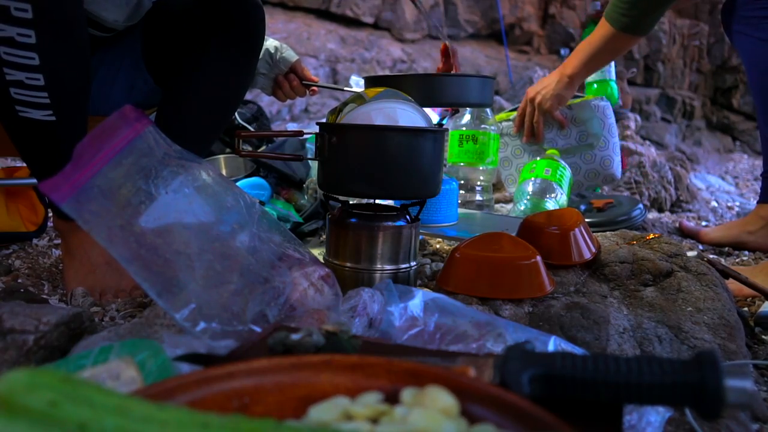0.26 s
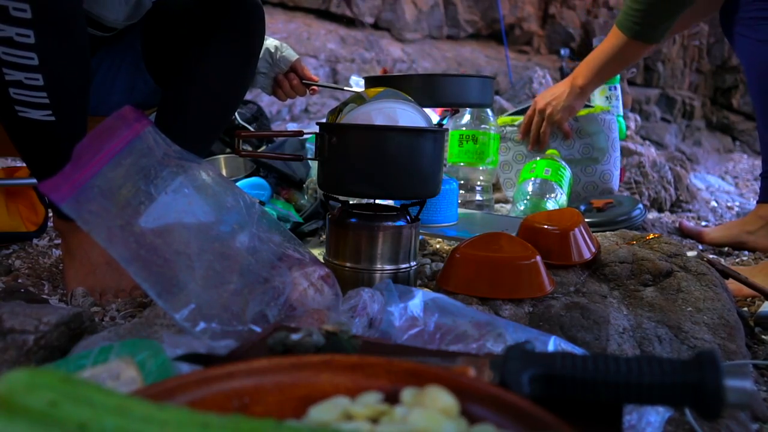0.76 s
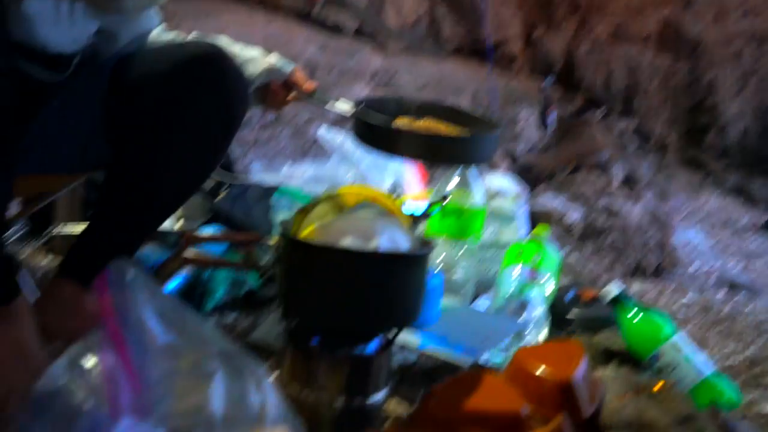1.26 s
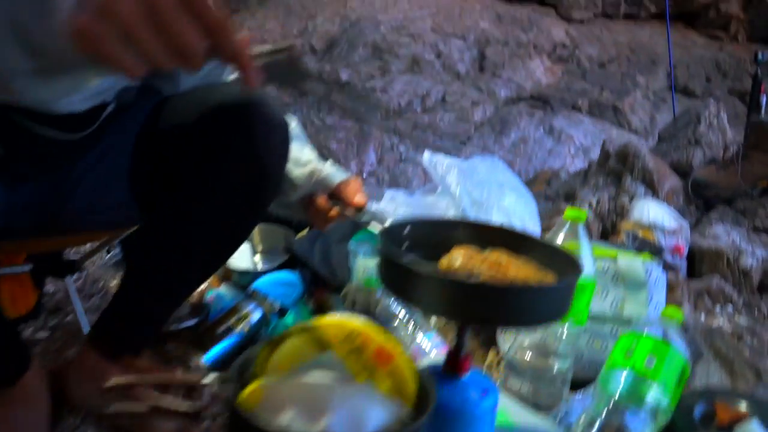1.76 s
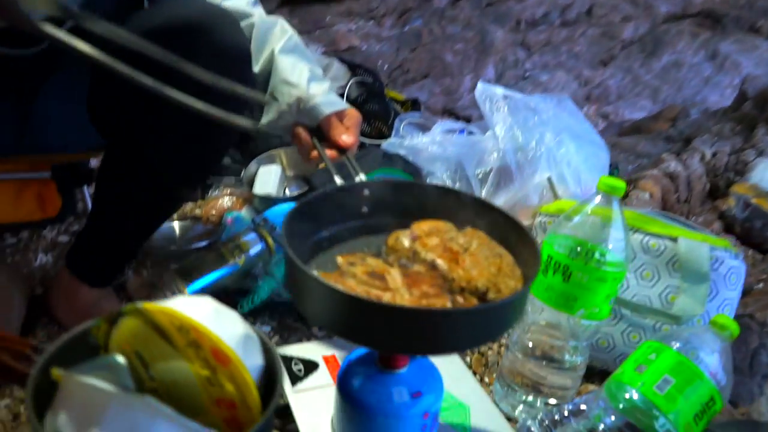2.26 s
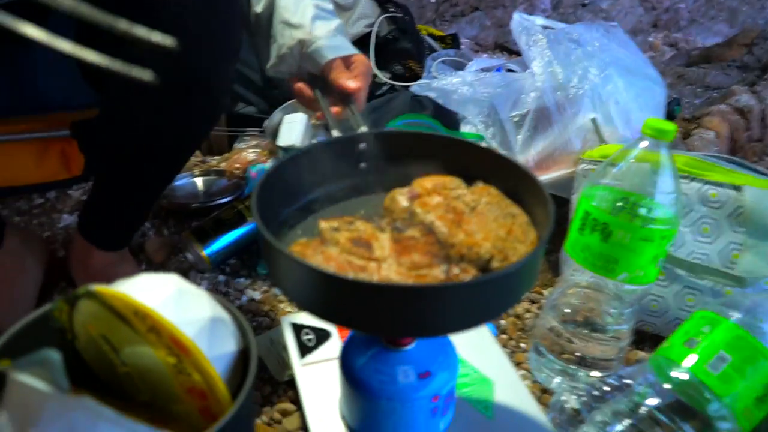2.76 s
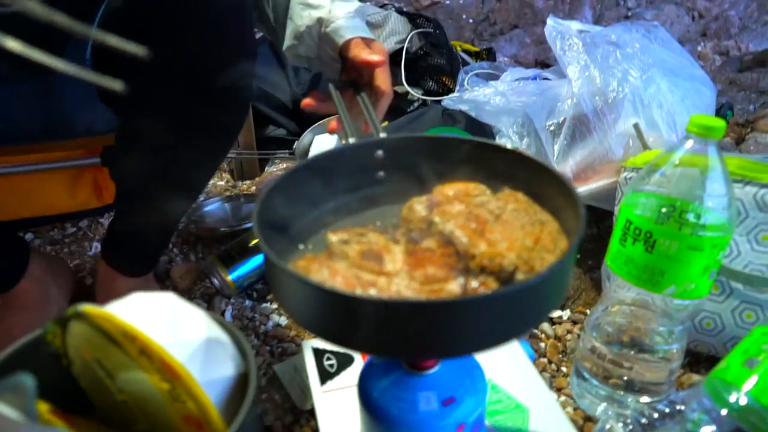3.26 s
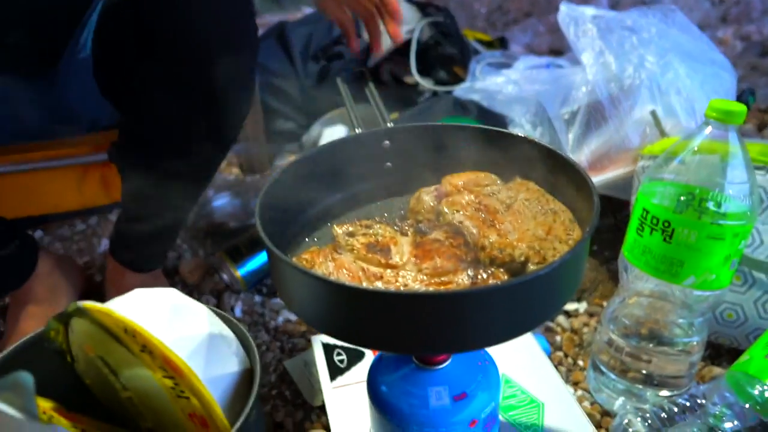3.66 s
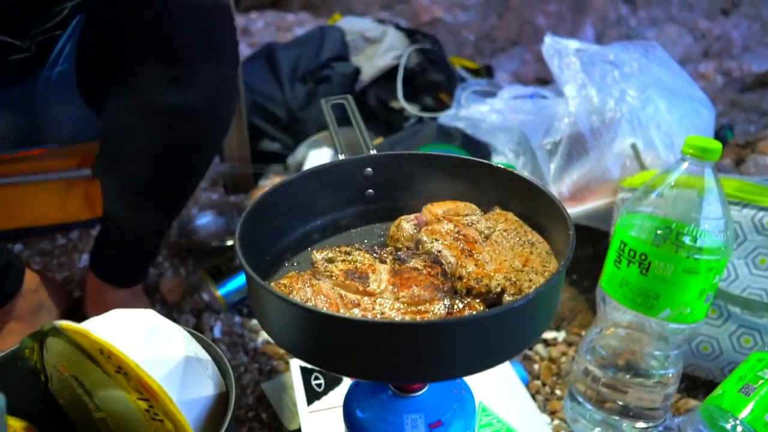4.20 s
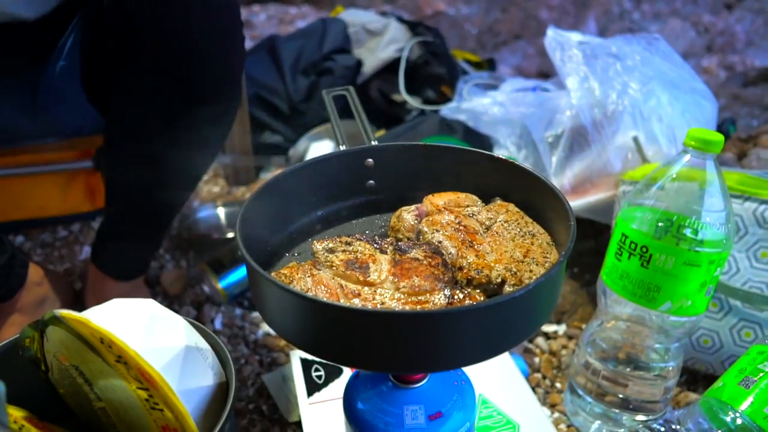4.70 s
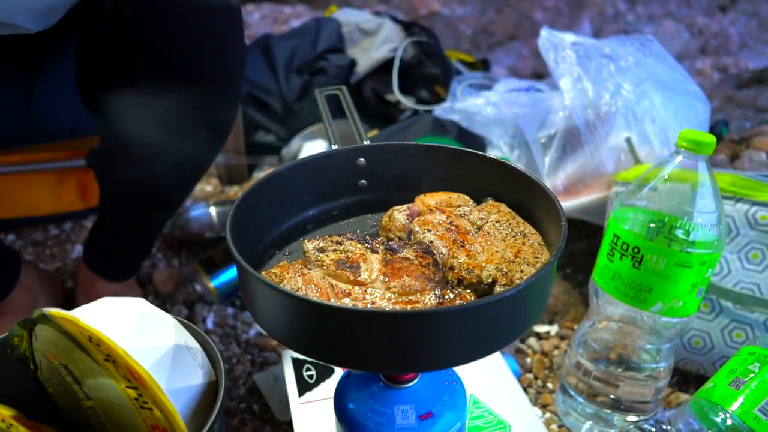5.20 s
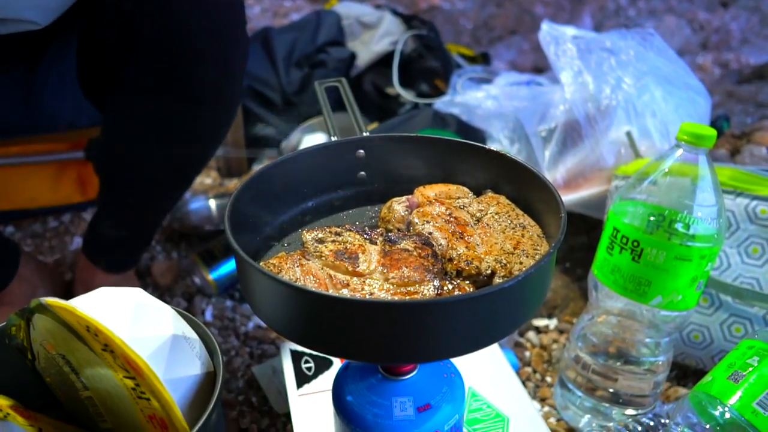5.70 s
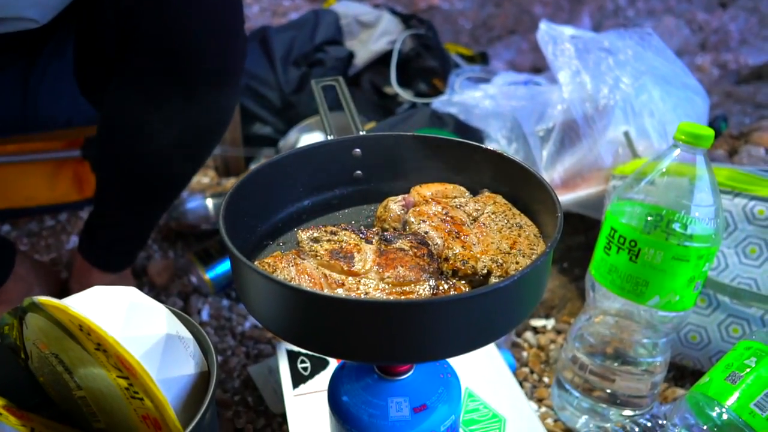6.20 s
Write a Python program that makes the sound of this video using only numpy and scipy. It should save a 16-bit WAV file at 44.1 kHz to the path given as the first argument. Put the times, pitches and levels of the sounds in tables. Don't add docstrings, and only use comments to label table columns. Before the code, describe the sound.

A hand-held microphone rests beside a roaring camp stove, with frying in the background and a tiny metal rattle. The scene switches suddenly with a low thud; the near roar drops away, wavering hums pass, and the frying pan arrives close, bright and crackling, popping with big fat spits over hissing gas. The sizzle and flame slowly weaken toward the end.

```python
import sys
import numpy as np
from scipy import signal
from scipy.fft import rfft, irfft, next_fast_len
from scipy.io import wavfile
from scipy.ndimage import uniform_filter1d

SR = 44100
rng = np.random.default_rng(int(sys.argv[2]) if len(sys.argv) > 2 else 0)


def amplitude_ratio(level_db):
    exponent = np.asarray(level_db, float) / 20
    return 10 ** exponent


def wav_out(sig):
    wavfile.write(sys.argv[1], SR, np.round(np.clip(np.atleast_2d(sig).T, -1, 1) * 32767).astype(np.int16))


N = 284445
CUT_S = 1.278
ARRIVE_S, CARRY_S = 2.13, 0.46

# time in seconds, level in dB.
TREMOR_LEVEL = [(0.0, -36), (0.22, -31), (0.34, -40), (0.77, -31), (1.02, -46), (1.26, -40), (1.29, -25),
                (1.55, -28), (1.95, -34), (2.04, -25), (2.12, -35), (2.58, -31), (2.9, -32), (3.4, -34),
                (3.55, -44), (3.85, -42), (4.1, -47), (6.45, -55)]
# pitch in Hz, level in dB per Hz.
TREMOR_COLOUR = [(2.4, -35), (4.0, 14), (22, 1), (30, 1), (48, -7), (62, -46), (110, -120)]
# pitch in Hz, level in dB, time to fade by 60 dB in seconds.
JOLT_MODES = [(9, -14, 0.8), (16.8, -18, 0.65), (35.8, -25, 0.87)]
# time in seconds, level in dB.
FINGER_THUMP = [(2.7, -24)]
# pitch in Hz, level in dB, time to fade by 60 dB in seconds.
HOUSING_MODES = [(82.4, -1.5, 0.15)]

# from in seconds, to in seconds, pitch in Hz, width in Hz, level in dB.
SWELLING_BANDS = [
    (0.065, .72, 5170, 520, -38),
    (0.75, 1.3, 3500, 300, -37),
    (1.76, 2.31, 582, 56, -27.5),
    (0.54, 1.4, 11000, 2300, -42),
    (1.24, 1.5, 2440, 280, -34),
    (1.46, 1.73, 2100, 340, -31.5),
    (1.9, 1.8, 3770, 350, -37),
    (1.91, 2.41, 1970, 380, -28.5),
    (0.75, 1.77, 975, 89, -30.5),
    (1.78, 2.1, 1020, 90, -32),
]

# time in seconds, level in dB.
NEAR_LEVEL = [(0.0, -17), (0.06, -19.5), (0.6, -18), (0.8, -19), (1.27, -17.5)]
# pitch in Hz, level in dB per Hz.
NEAR_ROAR = [(26, -41), (45, -8.5), (102, -12), (189, 0), (504, -7), (775, -5.5), (1370, -8), (1720, -24),
             (1990, -20), (2930, -21), (3820, -30), (5200, -20.5), (6000, -23), (7800, -31), (13200, -120)]
# pitch in Hz, width in Hz, level in dB.
NEAR_POT_HOLLOWS = [(190, 59, -11), (624, 110, 2.5), (781, 70, 2), (1030, 91, -1), (1244, 37, -1),
                    (1360, 40, 1), (2014, 98, -8), (2465, 74, -10.5), (2916, 100, -8.5), (3460, 440, -15)]
# time in seconds, level in dB.
PAN_FLAME_LEVEL = [(1.28, -25), (1.5, -28.5), (1.8, -22.5), (2.15, -26), (2.7, -25.5), (3.1, -26),
                   (3.6, -23), (4.1, -24.5), (5.6, -27.5), (5.9, -28), (6.15, -30.5), (6.45, -29.5)]
# pitch in Hz, level in dB per Hz.
PAN_HOLLOW_COLOUR = [(240, -36), (400, -34.5), (446, -18), (504, -8), (583, -3), (640, 1), (751, -4),
                     (793, -9), (868, -21), (950, -26), (1240, -53), (2090, -120)]
# pitch in Hz, level in dB per Hz.
LOW_ROAR_COLOUR = [(24, -30), (40, -9), (59, -10), (127, -7.5), (145, -6.5), (179, -3), (291, -2.5),
                   (415, -6), (480, -9.5), (620, -14), (1060, -120)]
# pitch in Hz, level in dB per Hz.
JET_HISS_COLOUR = [(680, -42), (1150, 3.5), (1300, -2), (1630, 9), (1830, -2), (2110, 7), (2430, -10.5),
                   (2630, 2), (3160, -12.5), (3730, 2), (4500, -16), (5850, -19), (9900, -120)]
# pitch in Hz, level in dB per Hz.
POT_HOLLOW_COLOUR = [(480, -10), (820, -10.5), (989, 2.5), (1050, -0.5), (1140, -11.5), (1330, -6),
                     (1450, -4.5), (1500, -18.5), (1950, -75), (3300, -120)]
ROAR_DB, ROAR_LIFT_DB_PER_S, ROAR_SINK_DB_PER_S = -28.5, 4.5, 1.68
ROAR_CLEAR_S = 2.75
HISS_FAR_DB, HISS_NEAR_DB, HISS_SINK_FROM_S, HISS_SINK_DB_PER_S = -37.5, -30.5, 3.7, 2.5
POT_DB, POT_RECEDE_DB_PER_S, POT_TURN_S, POT_TURN_DB, POT_SINK_DB_PER_S = -26.5, 2, 2.27, 6.5, 2

# time in seconds, level in dB.
TONGS_TAP = [
    (.8653, -8.5),
    (.86564, -8),
    (.867, -15),
    (.8684, -17),
    (.8698, -16),
    (.8711, -13),
    (.8762, -18),
]
# pitch in Hz, level in dB, time to fade by 60 dB in seconds.
RIM_MODES = [(2850, -8, .02), (3500, -16, .012), (4900, -6, .005), (5400, -2, .006), (6500, -12, .005),
             (7700, -12, .022), (8700, -4, .008), (10200, -12, .008)]

# time in seconds, level in dB, shading by hands, pots and distance in dB.
FRY_BEFORE_CUT = [(0.0, -24.5, 1), (0.165, -24.5, 1), (0.2, -26.5, 3.5), (0.45, -33, 3), (0.627, -30.5, 9),
                  (0.635, -34, 0), (0.88, -25.5, 2), (1.05, -27, 3), (1.28, -24.5, 2.5)]
# time in seconds, level in dB, shading in dB.
FRY_AFTER_CUT = [(1.28, -29, 6.5), (1.4, -26, 7), (1.6, -28, 6), (1.86, -25, 7), (2.05, -26.5, -2),
                 (2.4, -26.5, -2), (3.35, -29, -3.5), (3.55, -27, -0.5), (4.25, -28, 1), (4.7, -31, 0.5),
                 (5.4, -31, 1), (6.1, -33.5, -0.5), (6.45, -35, 2.5)]
# pitch in Hz, level in dB per Hz.
PAN_COLOUR = [(900, -26.5), (1900, 1.5), (2500, -1.5), (3100, -2.5), (3800, -2), (5200, -5.5), (6600, -6.5),
              (7600, -5.5), (8500, -1.5), (9000, -3.5), (9500, -7.5), (10500, -7.5), (13300, 6),
              (16200, 2.5)]
BURSTS_PER_S = 5500
FAR_UNEVEN = 0.74
MIDDLE_DB, TOP_DB, TOP_SHADE = 0.2, -5.5, 1.8
SEETHE_DB, SEETHE_PER_S = 0.84, 4.7

# time in seconds, peak in dB, pitch in Hz, spread in Hz.
BIG_SPITS = [(2.0163, -8, 2300, 600), (2.4106, -3, 7200, 3600), (2.5569, -3, 7100, 1800),
             (2.6249, -4, 2700, 1700), (2.6801, -3, 9900, 2700), (2.7923, -3, 6400, 3100),
             (3.0773, -3, 7000, 2900), (3.0842, -5, 4700, 1600), (3.1224, -5, 7500, 1400),
             (3.2421, -4, 5800, 3200), (3.279, -4, 9200, 2400), (3.5384, -6, 2700, 1200),
             (3.6956, -6, 10900, 1300), (3.7263, -7, 5300, 2000), (3.7607, -4, 5000, 1700),
             (3.8212, -4, 5900, 2000), (4.2055, -4, 6200, 2000), (4.2265, -3, 6400, 2700),
             (4.3374, -4, 8200, 3900), (4.39, -4, 9700, 4400), (4.4926, -6, 12200, 1800),
             (4.5688, -6, 6900, 2200), (4.7607, -5, 9600, 3900), (5.1717, -8, 4200, 1800),
             (5.3588, -4, 6700, 3000), (5.9824, -7, 6500, 2000), (5.9973, -8, 6900, 3500),
             (6.0791, -6, 3900, 1600), (6.22, -8, 7500, 3000), (6.4021, -12, 7400, 2600)]
# time in seconds, peak in dB, pitch in Hz, spread in Hz.
CLOSE_SPITS = [
    (2.0247, -5.5, 3000, 1000),
    (2.068, -7, 7800, 500),
    (2.0702, -7, 7900, 694),
    (2.0909, -2, 7300, 1200),
    (2.6236, -8, 1850, 300),
    (4.0184, -9, 13500, 900),
    (4.0356, -3, 5000, 2500),
    (6.0968, -14, 4000, 500),
]
# time in seconds, peak in dB, pitch in Hz.
MIDDLING_SPITS = [(1.388, -12, 2500), (1.9074, -11, 1900), (2.3842, -5, 7900), (2.5936, -6, 7400),
                  (2.7082, -5, 7200), (2.7292, -5, 7200), (3.1046, -6, 12800), (3.1297, -5, 8400),
                  (3.3339, -5, 11300), (3.3817, -5, 11900), (3.4993, -6, 6800), (3.5571, -7, 6100),
                  (3.775, -7, 6600), (3.8385, -6, 6900), (4.0, -7, 6300), (4.0258, -6, 6200),
                  (4.0701, -6, 10200), (4.1263, -7, 3600), (4.4392, -6, 7700), (4.4999, -8, 4300),
                  (4.8618, -9, 8500), (4.9018, -9, 8200), (5.2386, -9, 8900), (5.2764, -9, 7500),
                  (5.3157, -9, 6000), (5.3248, -8, 7700), (5.3673, -9, 8600), (5.3998, -9, 5600),
                  (5.5285, -8, 8400), (6.0245, -10, 7000)]
SMALL_FROM_S, SMALL_DB, SMALL_SINK_DB_PER_S, SMALL_HZ, SMALL_SPREAD = 2.3, -5, 1.6, 7200, .36
SNAP_HZ, SNAP_SHARE = 12500, .35

CUTOFF_HZ = 15720


def rms_one(x):
    return x / np.sqrt(np.mean(x ** 2) + 1e-20)


def since(start_s):
    return np.maximum(np.arange(N) / SR - start_s, 0)


def in_time(rows):
    s, *columns = np.transpose(rows)
    return [np.interp(np.arange(N) / SR, s, column) for column in columns]


def drift(rate):
    r = np.exp(-80 * np.pi * rate / SR)
    noise = rng.standard_normal(N // 40 + 2002)
    slow = signal.lfilter([1], [1, -2 * r, r * r], noise)[2000:]
    slow = rms_one(slow - slow.mean())
    return np.interp(np.arange(N) / 40, np.arange(len(slow)), slow)


def ring(clicks, hz, t60):
    r = amplitude_ratio(-60 / (t60 * SR))
    w = 2 * np.pi * hz / SR
    return signal.lfilter([np.sin(w)], [1, -2 * r * np.cos(w), r * r], clicks + 1e-18)


def struck(hits, modes):
    out = np.zeros(N)
    at, hit_db = np.transpose(hits)
    for hz, db, t60 in modes:
        clicks = np.zeros(N)
        clicks[(at * SR).astype(int)] = amplitude_ratio(hit_db + db + rng.normal(0, 1.5, len(at)))
        out += ring(clicks, hz, t60)
    return out


def colour(x, spectrum, peaks=(), peaks_db=0):
    size = next_fast_len(N + SR // 2, True) // 2 * 2
    hz = np.maximum(np.fft.rfftfreq(size, 1 / SR), 1)
    at, level = np.transpose(spectrum)
    power = amplitude_ratio(np.interp(np.log(hz), np.log(at), level, left=-70, right=-70)) ** 2
    for centre_hz, width, db in peaks:
        power = power + amplitude_ratio(db + peaks_db) ** 2 / (1 + (2 * (hz - centre_hz) / width) ** 2) ** 2
    cepstrum = irfft(np.log(power) / 2, size)
    cepstrum[1:size // 2] *= 2
    cepstrum[size // 2 + 1:] = 0
    response = np.exp(rfft(cepstrum))
    return rms_one(irfft(rfft(x, size) * response, size)[:N])


def flame(level_db, spectrum, flicker_db, peaks=(), peaks_db=0):
    noise = colour(rng.standard_normal(N), spectrum, peaks, peaks_db)
    return amplitude_ratio(level_db + flicker_db * drift(11.0)) * noise


def handling():
    wobble = colour(rng.standard_normal(N), TREMOR_COLOUR)
    wobble = wobble / np.sqrt(uniform_filter1d(wobble ** 2, size=SR // 6) + .1)
    tremor = 1.46 * amplitude_ratio(*in_time(TREMOR_LEVEL)) * wobble
    jolt = struck([(CUT_S, -1.5)], JOLT_MODES)
    return tremor + jolt + struck(FINGER_THUMP, HOUSING_MODES)


def swelling_bands():
    out, s = 0, np.arange(N) / SR
    faint_floor = [(20, -70), (20000, -70)]
    for start, end, centre_hz, width, db in SWELLING_BANDS:
        progress = np.clip((s - start) / (end - start), 0, 1)
        swell = np.sqrt(np.sin(np.pi * progress).clip(0))
        out = out + swell * flame(db, faint_floor, 0.96, [(centre_hz, width, 0)])
    return out


def near_burner():
    return flame(*in_time(NEAR_LEVEL), NEAR_ROAR, 0.72, NEAR_POT_HOLLOWS, peaks_db=-1.5)


def pot_burner():
    turned = since(POT_TURN_S)
    pot_db = POT_DB - POT_RECEDE_DB_PER_S * (since(CUT_S) - turned)
    pot_db = pot_db - POT_TURN_DB * (turned > 0) - POT_SINK_DB_PER_S * turned
    return flame(pot_db, POT_HOLLOW_COLOUR, 0.59)


def pan_burner():
    hollow = flame(*in_time(PAN_FLAME_LEVEL), PAN_HOLLOW_COLOUR, 0.98)
    clear = since(ROAR_CLEAR_S)
    roar_db = ROAR_DB - ROAR_LIFT_DB_PER_S * (since(CUT_S) - clear) - ROAR_SINK_DB_PER_S * clear
    close = np.clip(since(ARRIVE_S - CARRY_S) / CARRY_S, 0, 1)
    hiss_db = HISS_FAR_DB + (HISS_NEAR_DB - HISS_FAR_DB) * close
    hiss_db = hiss_db - HISS_SINK_DB_PER_S * since(HISS_SINK_FROM_S)
    return hollow + flame(roar_db, LOW_ROAR_COLOUR, 0.16) + flame(hiss_db, JET_HISS_COLOUR, 0.91)


def burners():
    after = np.arange(N) >= CUT_S * SR
    return np.where(after, pan_burner() + pot_burner(), near_burner()) + swelling_bands()


def tongs():
    return struck(TONGS_TAP, RIM_MODES)


def fat_bursts():
    uneven = np.where(since(ARRIVE_S) > 0, 1, FAR_UNEVEN)
    sizes = amplitude_ratio(4.3 * uneven * np.minimum(rng.exponential(1, N), 4.0)) * rng.choice([-1, 1], N)
    clumps = amplitude_ratio(0.88 * drift(14) + 2.2 * drift(90))
    bursts = sizes * (rng.random(N) < BURSTS_PER_S * clumps / SR)
    pitches = np.geomspace(1500, 17500, num=18)
    dealt = rng.integers(0, 25, N)
    fizz = 1.5 * bursts * (dealt >= len(pitches))
    for k, hz in enumerate(pitches):
        fizz += ring(bursts * (dealt == k), hz, 6.6 / hz) * hz / 9000
    return rms_one(fizz)


def frying():
    crackle = (rng.random(N) < 260 / SR) * amplitude_ratio(rng.uniform(-12, 0, N)) * rng.choice([-1, 1], N)
    crackle = 11 * crackle * np.where(since(ARRIVE_S - CARRY_S) > 0, 1, .4)
    finest = 0.73 * rng.standard_normal(N)
    fizz = colour(fat_bursts() + crackle + finest, PAN_COLOUR)
    below_6k, below_10k = (signal.sosfiltfilt(signal.butter(3, hz, fs=SR, output="sos"), fizz)
                           for hz in (6000, 10000))
    dull_db, shade_db = np.where(since(CUT_S) > 0, in_time(FRY_AFTER_CUT), in_time(FRY_BEFORE_CUT))
    dull_db = dull_db + SEETHE_DB * drift(SEETHE_PER_S)
    middle_db = dull_db + MIDDLE_DB - shade_db
    top_db = dull_db + TOP_DB - TOP_SHADE * shade_db
    dull = amplitude_ratio(dull_db - 2.22) * rms_one(below_6k)
    middle = amplitude_ratio(middle_db) * rms_one(below_10k - below_6k)
    return dull + middle + amplitude_ratio(top_db) * rms_one(fizz - below_10k)


def small_spits(count=60):
    luck = rng.random((count, 4))
    s = SMALL_FROM_S + luck[:, 0] * (N / SR - SMALL_FROM_S)
    hz = SMALL_HZ * 2 ** (1.5 * (luck[:, 1] - .5))
    db = SMALL_DB - SMALL_SINK_DB_PER_S * (s - SMALL_FROM_S) - 4.0 * luck[:, 2]
    spread_hz = hz * SMALL_SPREAD * (.4 + 1.2 * luck[:, 3])
    middling = [(s, db, hz, hz * SMALL_SPREAD) for s, db, hz in MIDDLING_SPITS]
    return list(zip(s, db, hz, spread_hz)) + middling


def spits():
    out, t = np.zeros(N + 400), np.arange(400) / SR
    for s, db, hz, spread_hz in list(BIG_SPITS) + list(CLOSE_SPITS) + small_spits():
        rise = 1 / (2 * np.pi * (.85 * spread_hz + 250))
        after_peak = t - rise
        drop = t / rise * np.exp(1 - t / rise) * np.cos(2 * np.pi * hz * after_peak)
        snap = np.exp(-(after_peak * SNAP_HZ) ** 2) * np.cos(2 * np.pi * SNAP_HZ * after_peak)
        drop += SNAP_SHARE * min(hz / SMALL_HZ, 1) ** 2 * snap
        drop[:40] -= drop.sum() * np.hanning(40) / np.hanning(40).sum()
        start = round((s - rise) * SR)
        out[start:start + 400] -= amplitude_ratio(db - .5) * drop
    return out[:N]


def scene():
    mono = handling() + burners() + tongs() + frying() + spits()
    return np.array([mono, mono])


def band_limit(x):
    return signal.sosfilt(signal.butter(12, 17020, fs=SR, output="sos"), x)


def record(dry):
    rounded = 1.3 * np.tanh(dry / 1.3)
    top_cut = signal.ellip(12, .3, 80, CUTOFF_HZ, fs=SR, output="sos")
    return band_limit(signal.sosfilt(top_cut, rounded))


dry = scene()
out = record(dry)
wav_out(out)
```